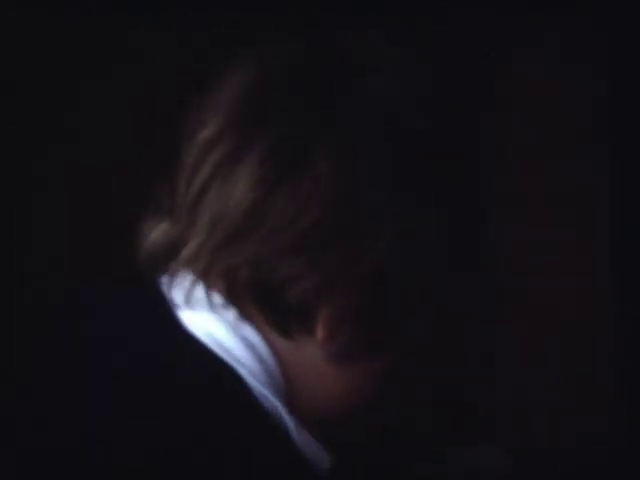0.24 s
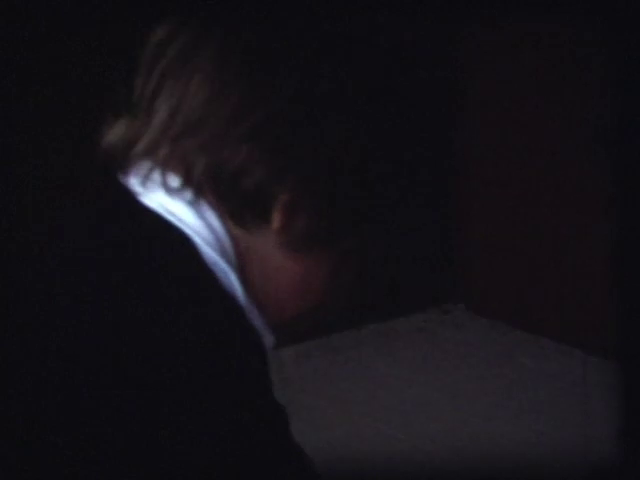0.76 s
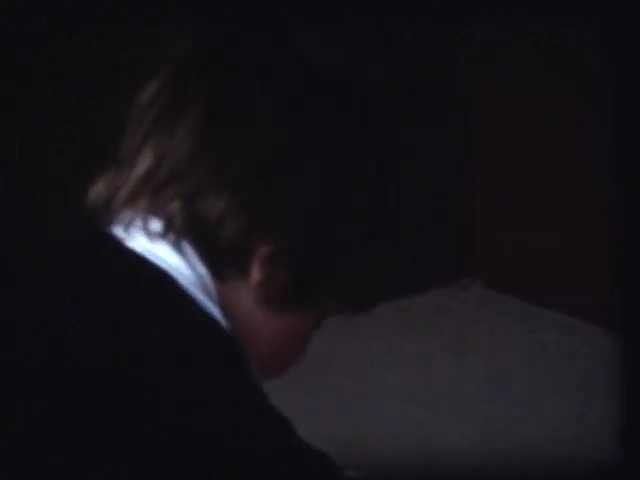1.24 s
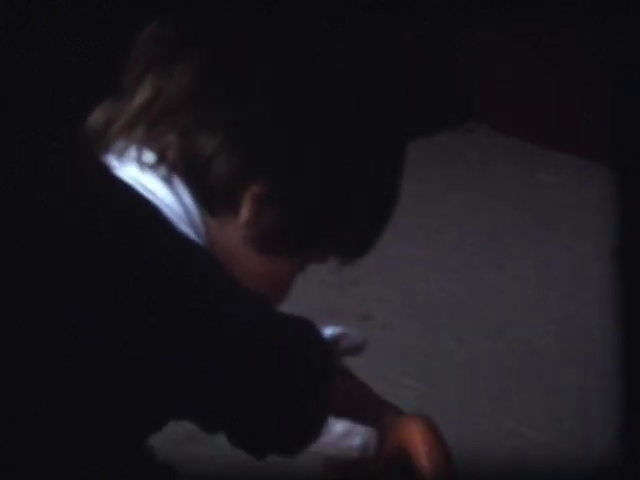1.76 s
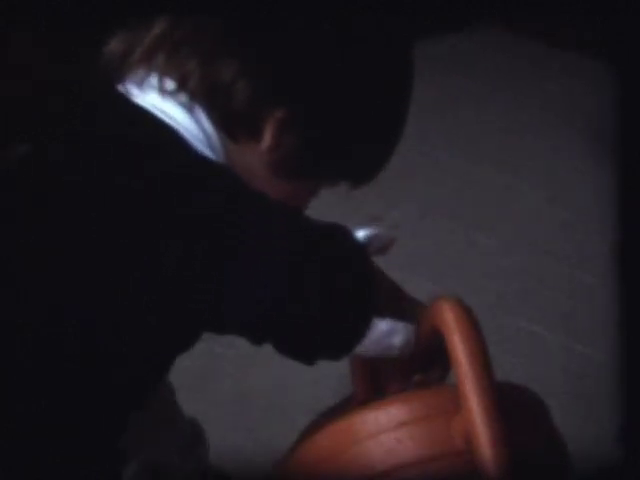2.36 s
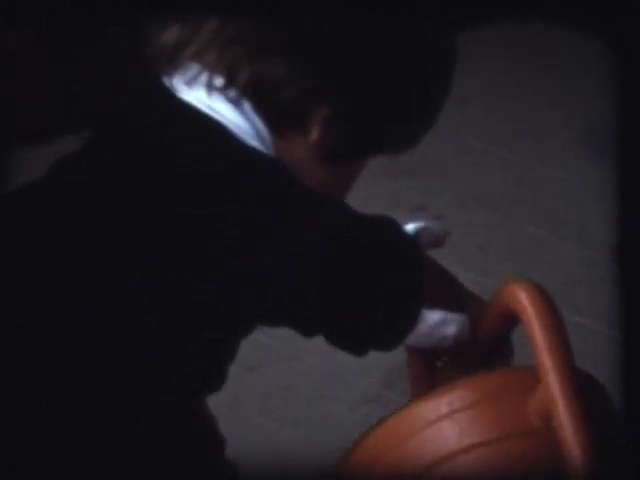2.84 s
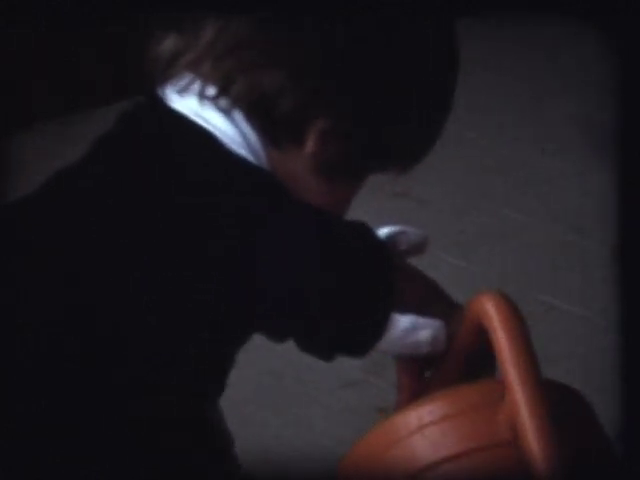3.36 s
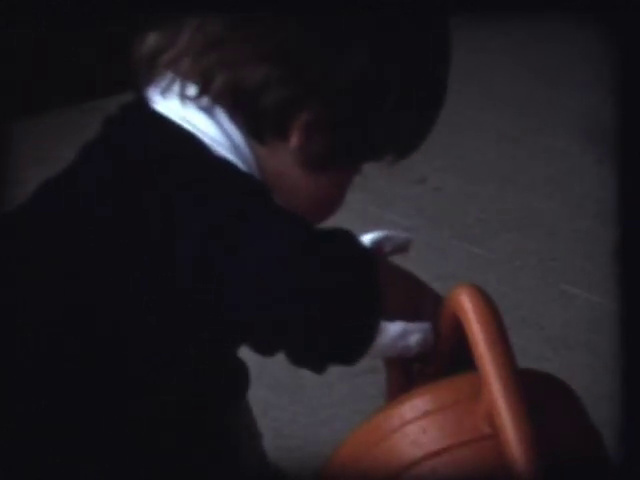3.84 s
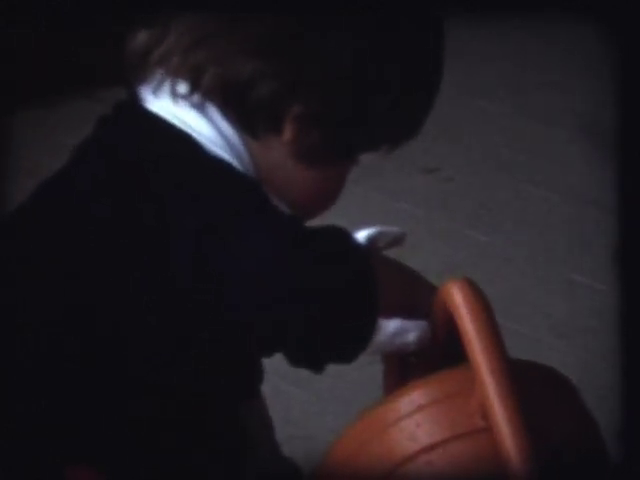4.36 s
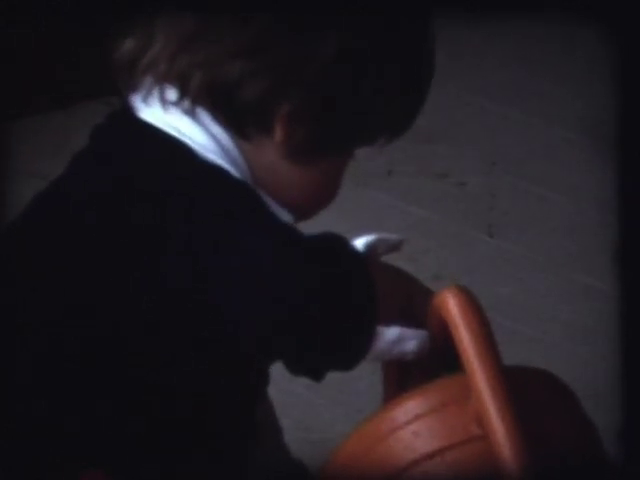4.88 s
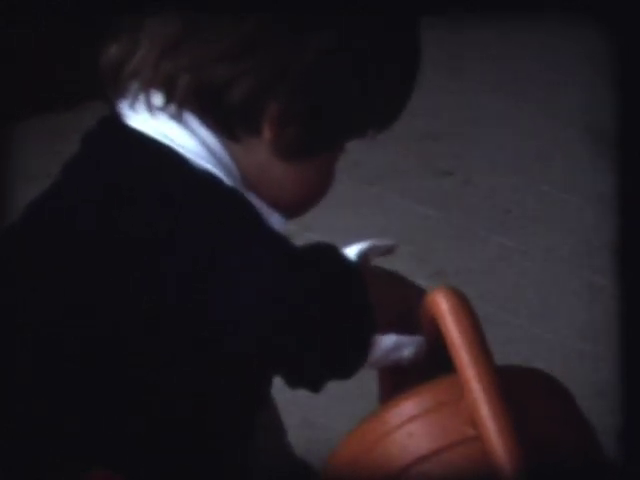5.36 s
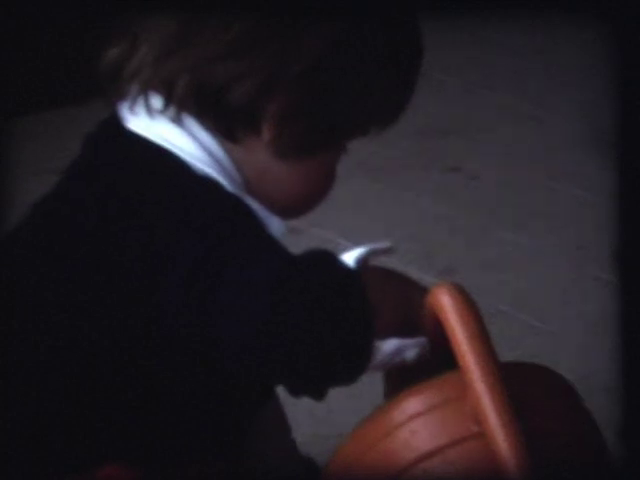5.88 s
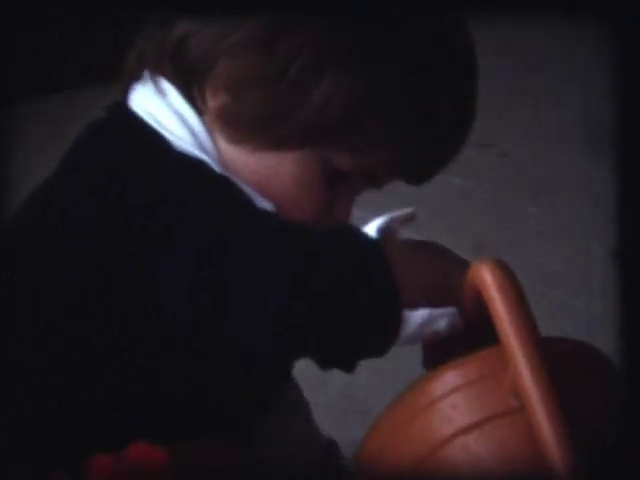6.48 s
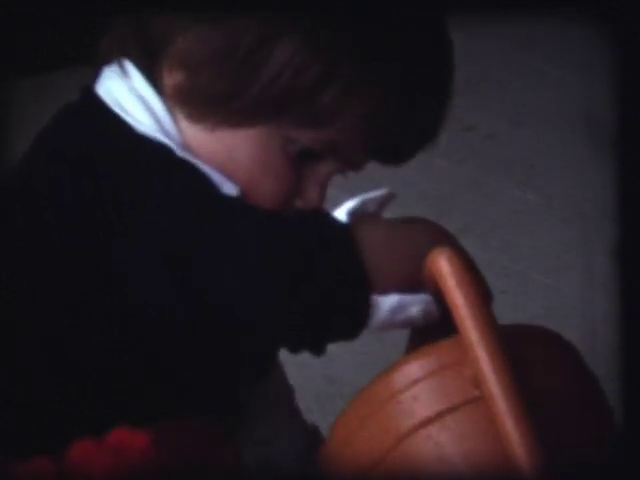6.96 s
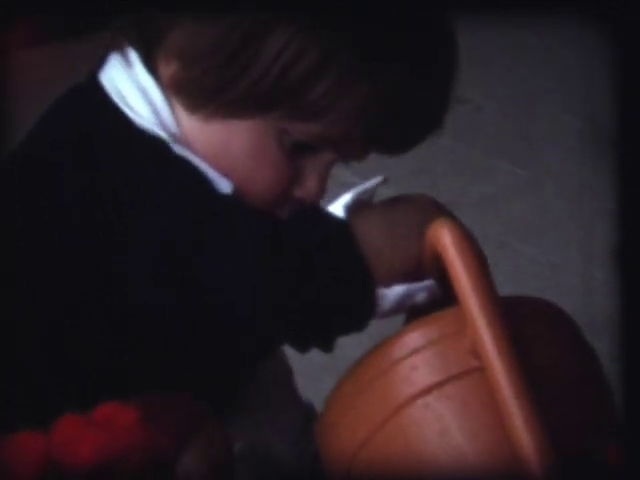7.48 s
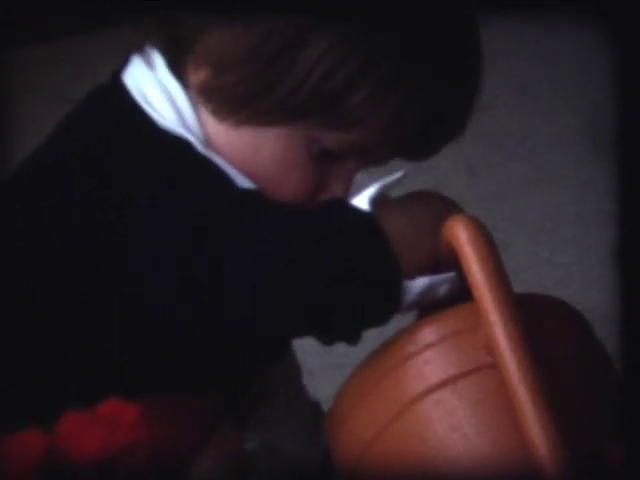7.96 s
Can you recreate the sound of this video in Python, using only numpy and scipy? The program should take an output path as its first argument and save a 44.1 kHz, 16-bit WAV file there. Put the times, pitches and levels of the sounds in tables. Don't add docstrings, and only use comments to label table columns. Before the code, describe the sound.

A film projector is already running at 0 s, a couple of metres from a stereo microphone in a small hard room. A steady motor whine near 660 hertz, with beating mains-like hum, sits over breathy fan rush, a resonant housing drone, faint gear scrape and hiss. Crisp metallic claw ticks repeat about fifteen times a second until 3.0 s. At 3.07-3.3 s bright snaps and a short rattle break out, with thin high spring rings fading. Whir alone continues until ticking resumes at 3.65 s. Small clicks fall near 4.5 s, a cluster at 5.2-5.35 s, and a ringing metallic clack at 5.67 s. The whine softens somewhat after 5 s. Ticking ends near 6.4 s with a click; light clicks come around 7.4-7.6 s as the whine swells. At 8.0 s a dull switch knock changes it to a weaker 690-hertz tone and fuller housing hum, with a few last ticks.

```python
import sys
import numpy as np
from scipy import signal
from scipy.fft import rfft, irfft, next_fast_len
from scipy.io import wavfile
from scipy.ndimage import uniform_filter1d

SR = 44100
rng = np.random.default_rng(int(sys.argv[2]) if len(sys.argv) > 2 else 0)


def gain_from_db(level_db):
    decades = np.asarray(level_db, float) / 20
    return 10 ** decades


def digitize_waveform(pressure):
    field = np.atleast_2d(pressure).T
    bounded = np.clip(field, -1, 1)
    quanta = np.round(bounded * 32767).astype(np.int16)
    wavfile.write(sys.argv[1], SR, quanta)


N = 362484

SWITCH_S = 7.99
CAM_RATIO = .34983

# time in seconds, speed in turns per second.
SHAFT_SPEED = [(0.0, 44.002), (1.5, 43.974), (3.0, 43.965), (4.0, 43.956), (4.7, 43.968), (5.3, 43.987),
               (7.0, 44.006), (7.95, 43.962)]
# time in seconds, level in dB.
WHINE_LEVEL = [(0, -29), (3.0, -29), (4.8, -29.5), (5.3, -32.5), (7.4, -32), (7.62, -28), (7.9, -29.5),
               (8.0, -35)]
# shaft order, mains-hum order, level in dB, lead of the left port in radians.
LOUD_TONES = [(15, 1, -40, .33), (15, 2, -39, .08), (16, 0, -45, .12), (8, 3, -44, -.21),
              (14, 1, -45, -.17)]
# shaft order, mains-hum order, level in dB.
FAINT_TONES = [(0, 1, -77), (0, 2, -51), (1, 3, -53), (2, 1, -62), (3, 0, -62), (3, 1, -52), (3, 4, -48),
               (4, 0, -68), (5, 0, -51), (5, 1, -57), (5, 2, -58), (5, 4, -50), (6, 0, -60), (6, 1, -48),
               (6, 4, -55), (7, 4, -59), (8, -1, -62), (8, 0, -57), (9, 1, -59), (10, 1, -56), (11, 2, -53),
               (11, 3, -56), (12, 0, -57), (14, 0, -55), (15, -1, -54), (16, 1, -57), (17, 0, -50),
               (18, 0, -55), (19, 0, -56), (20, 0, -60)]
# cam order, level in dB.
CAM_TONES = [(5, -78), (7, -73), (8, -73), (9, -77), (11, -59), (12, -54), (14, -63), (15, -55), (16, -58),
             (17, -64), (18, -60), (24, -53), (25, -62), (27, -62), (28, -55), (29, -54), (31, -49),
             (32, -53), (33, -62), (34, -51), (35, -50), (36, -55), (37, -60), (38, -60), (70, -58)]
# frequency in Hz, gain in dB.
AIR_COLOUR = [(650, -33), (1100, -5), (1900, -5), (2950, -5.5), (3300, -1), (4350, -1), (5300, -11.5),
              (8500, -29)]
# time in seconds, level in dB.
DRAUGHT_LEVEL = [(0, -0.4), (2.3, -1), (3.3, 0.5), (6.2, 1.4), (7, -0.5), (8.2, 1)]
# centre in Hz, width in Hz, level in dB.
HOUSING_RUNNING = [(90, 30, -40), (130, 45, -37), (208, 53, -5.5), (258.5, 89, -12), (353.5, 81, -0.5),
                   (446, 63, -2.5), (538.6, 82, 2.5), (653, 54, 0), (721, 117, 1), (830, 103, -6),
                   (977, 130, -3), (1102, 24, 1)]
# centre in Hz, width in Hz, level in dB.
HOUSING_SWITCHED = [(133, 65, -8), (220, 41, 19), (330, 90, 9), (435, 33, 18), (490, 57, 9), (540, 63, 15),
                    (635, 120, 14), (750, 29, 23.5), (780, 41, 13), (846, 20, 21), (1020, 550, 7)]
# centre in Hz, width in Hz, level in dB.
GEAR_PLATE = [(3400, 230, -2.9), (3496, 110, -0.2), (3690, 130, 0.27), (4430, 310, -0.85)]
# first tick in seconds, last tick in seconds, frame period in seconds.
CLAW_RUNS = [
    (.0120, 3.01, .065009),
    (3.6534, 6.39, .064995),
    (8.0539, 8.22, .0666),
]
CLAW_RUN_DB = [2, 1.1, 2.5]
# centre in Hz, width in Hz, level in dB.
CLAW_METAL = [(3480, 980, -3), (4100, 1600, -5), (5442, 455, 4), (5750, 680, 3), (7000, 3000, -6.5),
              (8620, 910, 0.5), (9600, 2000, -7.5), (11650, 860, -1.5), (13100, 2900, -12.5)]
# delay in ms, mid level in dB, side level in dB.
REFLECTIONS = [(0, 5.5, -4), (2.8, -2, -7), (7.0, 0, 4), (10.4, 2.5, 3), (14.4, 3, -1), (17.6, -1, -1),
               (23.5, -4, -1), (37.5, -3, -3)]
# start in seconds, bright level in dB, its centre in Hz,
# dull part in dB relative to the bright, length in ms.
KNOCK_EVENTS = [(2.875, -22, 11200, 0, 2), (3.068, -8, 9000, -1, 5.6), (3.0976, -8.5, 12000, -3.5, 1.4),
                (3.111, 2.5, 10700, -16, 45), (3.2767, -3, 10600, -9, 14), (3.4617, -14.5, 10500, -4, 1.7),
                (3.7837, -21, 10000, 9, 2.4), (4.47, -14, 11000, -7, 3), (4.4994, -24, 11500, 5, 1.2),
                (4.6494, -17.5, 11500, -3, 1.4), (5.2165, -9.5, 10500, -5, 12),
                (5.2822, -3.5, 11100, -6.5, 2.6), (5.315, -11, 10500, -4, 8), (5.35, -18, 10000, -2, 5.5),
                (5.669, -9.5, 13000, 2, 0.97), (6.1877, -19, 11500, 0, 1.4), (6.253, -14.5, 11400, -6, .8),
                (6.4517, -12, 11500, 2.5, 3.2), (7.425, -23.5, 12400, -4, 1.3),
                (7.4939, -13.5, 11000, -3, 1.7), (7.5296, -14.5, 11000, -3, 1.2),
                (7.61, -21.5, 10500, 0, 8), (8.0072, -35.5, 10000, 19, 3.7)]
# start in seconds, pitch in Hz, width in Hz, level in dB.
STRUCK_METAL = [(3.12, 4730, 3500, -8), (3.781, 1260, 400, -27), (5.282, 1600, 1500, -27),
                (5.67, 2300, 600, -11.5), (5.669, 3920, 450, -5.5), (5.67, 5440, 600, -15),
                (5.669, 9600, 1500, -9), (5.669, 10900, 2510, -1.5), (6.452, 11500, 1500, -14),
                (7.43, 1310, 900, -22), (7.494, 4960, 600, -22), (7.509, 1220, 600, -17.5),
                (7.82, 4300, 400, -19), (8.007, 5530, 800, -26)]
# start in seconds, level of the first and of the second spring in dB.
SPRING_PLUCKS = [
    (3.112, -26, -42),
    (3.277, -29, -28),
]
# frequency in Hz, side relative to mid in dB.
PORT_SIDE = [(60, -3), (200, -15.5), (700, -15.5), (2400, -10), (5500, -8), (9000, 2.5), (11500, -15),
             (14000, -7.5)]
# frequency in Hz, gain in dB.
MIC_RESPONSE = [(20, 0), (13300, 0), (14200, -3), (14500, -10), (15400, -16), (15700, -50)]


def level(x, db):
    return x * gain_from_db(db) / np.sqrt(np.mean(x ** 2))


def colour(x, points):
    size = next_fast_len(x.shape[-1])
    hz, db = np.transpose(points)
    bins_hz = np.arange(size // 2 + 1) * SR / size
    gain = gain_from_db(np.interp(np.log(bins_hz + 1), np.log(hz), db))
    return irfft(rfft(x, size) * gain, size)[..., :x.shape[-1]]


def over_time(points):
    return np.interp(np.arange(N) / SR, *np.transpose(points))


def ring(x, modes, twice=False):
    out = 0
    for k, (hz, width_hz, db) in enumerate(modes):
        peak = signal.iirpeak(hz, hz / width_hz, SR)
        y = signal.lfilter(*peak, x)
        if twice:
            y = signal.lfilter(*peak, y)
        out = out + (-1) ** k * gain_from_db(db) * y
    return out


def walk(rate):
    k = int(SR / rate)
    held = np.repeat(rng.standard_normal(N // k + 1), k)
    return 1.3 * uniform_filter1d(uniform_filter1d(held, k), k)[:N]


def burst(length_ms):
    decay = np.exp(-np.arange(1024) / SR * 1000 / length_ms)
    puff = rfft(rng.standard_normal(1024) * decay)
    return irfft(puff / np.abs(puff))


def add(track, s, sound):
    i = int(s * SR)
    track[i:i + len(sound)] += sound[:N - i]


def shaft_turns():
    return np.cumsum(over_time(SHAFT_SPEED)) / SR


def motor(running):
    t, half = np.arange(N) / SR, np.array([[.5], [-.5]])
    shaft, hum = 2 * np.pi * shaft_turns(), 2 * np.pi * 99.99 * t
    wavers = [gain_from_db(walk(4)) for _ in range(5)]

    whine = (15, 0, over_time(WHINE_LEVEL), -.33)
    loud = 0
    for k, (turns, hums, db, lead) in enumerate([whine, *LOUD_TONES]):
        hum_angle = hums * (hum + .75 - .49 * hums)
        tone = np.sin(turns * shaft + hum_angle + lead * half)
        loud = loud + gain_from_db(db) * wavers[k % 5] ** .5 * tone

    free_db = -7 * np.clip((t - 6.45) * 10, 0, 1)
    tones = [(turns * shaft + hums * hum, db) for turns, hums, db in FAINT_TONES]
    tones += [(turns * CAM_RATIO * shaft, db + free_db * (turns >= 25)) for turns, db in CAM_TONES]
    faint = 0
    for k, (angle, db) in enumerate(tones):
        start = rng.uniform(0, 2 * np.pi)
        faint = faint + gain_from_db(db) * wavers[k % 5] * np.sin(angle + start)
    lead_s = -5e-5
    faint = faint + lead_s * SR * half * np.gradient(faint)

    switched = gain_from_db(-34 + 1.6 * walk(12)) * np.sin(2 * np.pi * 688 * t + .1 * half)
    return np.sqrt(2) * (running * (loud + faint) + (1 - running) * switched)


def fan():
    flicker = gain_from_db(.3 * walk(3) + .8 * walk(20) + over_time(DRAUGHT_LEVEL))
    return level(colour(rng.standard_normal((3, N)), AIR_COLOUR), -36.5) * flicker


def housing(running):
    rush = rng.standard_normal((2, 2, N))
    before = level(ring(rush[0], HOUSING_RUNNING, twice=True), -35.5)
    after = level(ring(rush[1], HOUSING_SWITCHED, twice=True), -32)
    return running * before + (1 - running) * after


def gears():
    size = 2867
    flaws = rng.standard_normal(size) * gain_from_db(4 * rng.exponential(size=size))
    cam_angle = CAM_RATIO * shaft_turns() % 1
    scrape = np.interp(cam_angle, np.arange(size) / size, flaws)
    return level(ring(scrape, GEAR_PLATE), -44)


def claw():
    track, habit = np.zeros(N), burst(length_ms=1.0)
    for (first, last, period), db in zip(CLAW_RUNS, CLAW_RUN_DB):
        for s in np.arange(first, last, period):
            late, strong = rng.standard_normal(2)
            tick = habit + 0.32 * burst(0.99)
            add(track, s + 4e-5 * late, gain_from_db(db + 0.63 * strong) * tick)
    return gain_from_db(-9) * ring(track, CLAW_METAL)


def room(x):
    t = np.arange(int(.8 * SR)) / SR
    noise = rng.standard_normal((2, len(t)))
    low = signal.lfilter(*signal.butter(2, 6000, fs=SR), noise)
    top = signal.lfilter(*signal.butter(4, 12300, "high", fs=SR), noise)
    tail = 0
    for band, t60_s in [(low, .62), (noise - low - top, .43), (top, .32)]:
        tail = tail + band * gain_from_db(-60 * t / t60_s)
    answer = gain_from_db(13) * tail * np.clip(t / .008, 0, 1) / np.sqrt(.03 * SR)
    for ms, *dbs in REFLECTIONS[1:]:
        for track, db in zip(answer, dbs):
            add(track, ms / 1000, gain_from_db(db) * burst(.45))
    answer[0] = colour(answer[0], [(5800, 2.5), (7200, -10.0), (8600, -4.5), (9500, -3.5)])
    answer[:, 0] += gain_from_db(REFLECTIONS[0][1:])
    heard = signal.fftconvolve(x[None], answer, axes=1)
    heard[:, :len(t) - 1] += heard[:, N:]
    return heard[:, :N]


def knocks():
    track = np.zeros(N)
    for s, db, hz, dull_db, length_ms in KNOCK_EVENTS:
        snap = ring(burst(length_ms), [(hz, 0.24 * hz, 5.0)])
        dull = ring(burst(length_ms), [(3900, 7200, 3.3)])
        add(track, s, gain_from_db(db) * (snap + gain_from_db(dull_db) * dull))
    for s, hz, width_hz, db in STRUCK_METAL:
        note = ring(np.arange(4096) == 0, [(hz, width_hz, 0)], twice=True)
        add(track, s, gain_from_db(db) * note / np.sqrt(np.sum(note ** 2)))
    return track


def springs():
    track, t = np.zeros(N), np.arange(SR // 2) / SR
    t60_s, rise_s = .55, .008
    for s, *dbs in SPRING_PLUCKS:
        for hz, db in zip((5955, 5430), dbs):
            flutter_db = 4.2 * walk(77)[:len(t)]
            swell = gain_from_db(db - 60 * t / t60_s + flutter_db) * np.minimum(t / rise_s, 1)
            add(track, s, swell * np.sin(2 * np.pi * hz * t))
    return track


def scene():
    running = np.clip((SWITCH_S - np.arange(N) / SR) / 0.017 + .5, 0, 1)
    air = fan()
    in_room = room(gain_from_db(-21.5) * air[0] + claw() + knocks())
    mid, side = housing(running) + air[1:] + in_room
    mid = mid + gears() + springs()
    side = colour(side, PORT_SIDE)
    return motor(running) + np.array([mid + side, mid - side])


def top_cut(x):
    return signal.sosfilt(signal.butter(12, 15620, fs=SR, output="sos"), x)


def record(dry):
    mid, side = rng.standard_normal((2, N)) * gain_from_db([[-55.5], [-55]])
    hiss_colour = [(20, -17), (100, 7), (3000, -13), (6000, -0.5), (13550, 4.5), (13800, -30)]
    hiss = colour(np.array([mid + side, mid - side]), hiss_colour)
    heard = colour(dry, MIC_RESPONSE) * gain_from_db([[-.25], [.25]]) + hiss
    lag = 147
    now, later = np.arange(lag + 1) == 0, np.arange(lag + 1) == lag
    mix = signal.lfilter(now - .93 * later, now - .76 * later, heard) * .91
    return top_cut(mix)


dry = scene()
out = record(dry)
digitize_waveform(out)
```